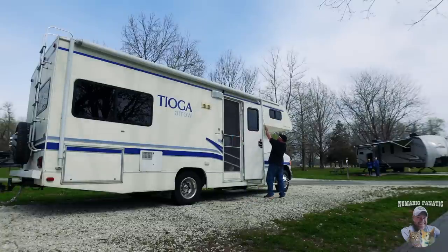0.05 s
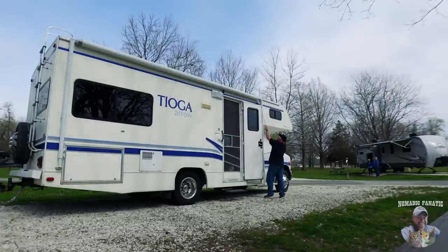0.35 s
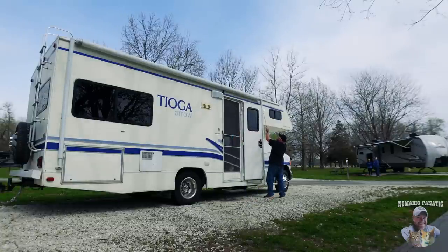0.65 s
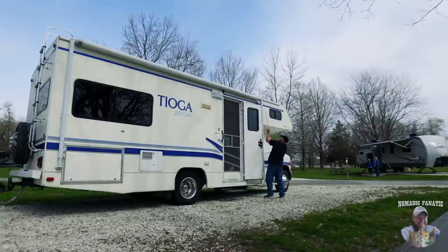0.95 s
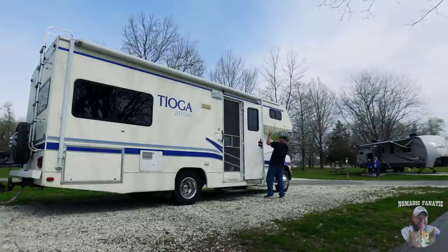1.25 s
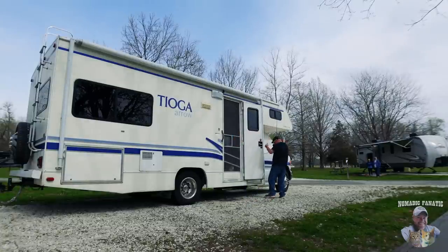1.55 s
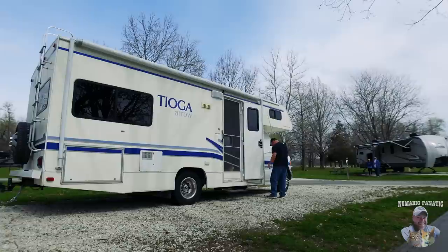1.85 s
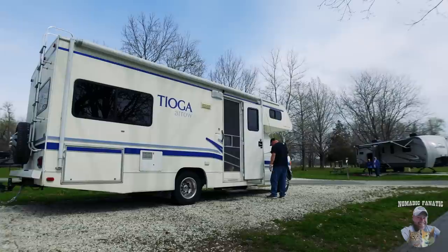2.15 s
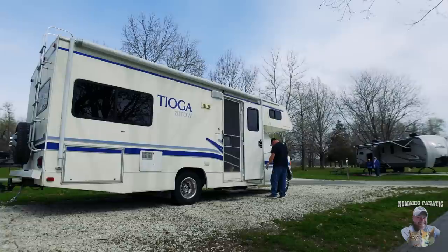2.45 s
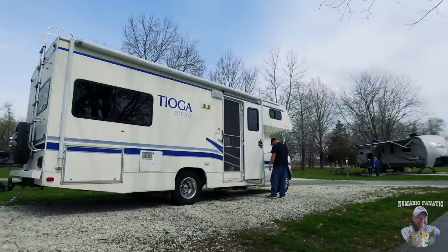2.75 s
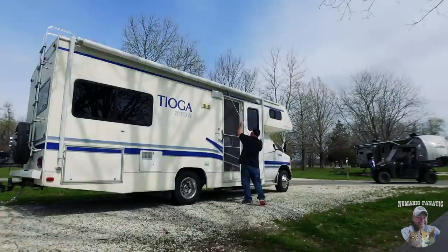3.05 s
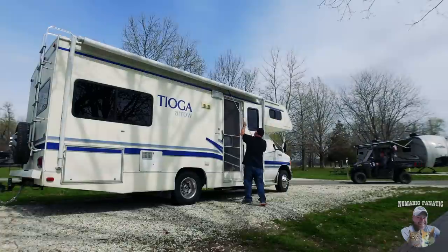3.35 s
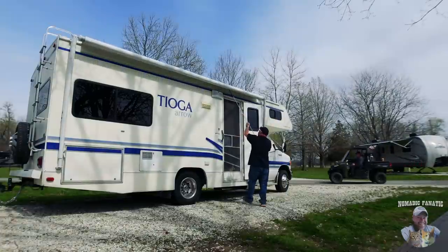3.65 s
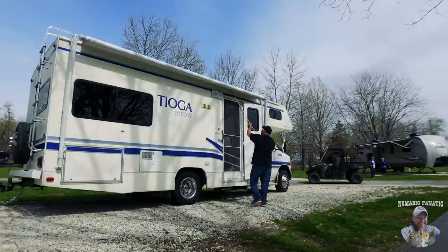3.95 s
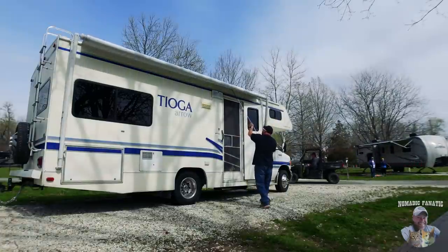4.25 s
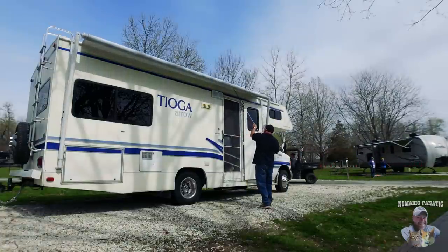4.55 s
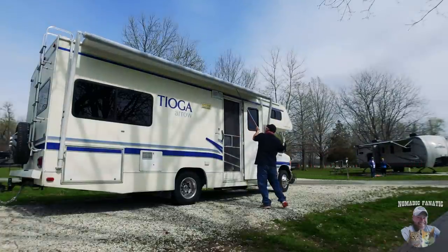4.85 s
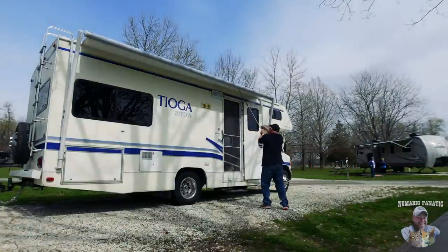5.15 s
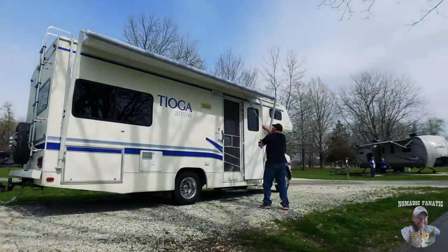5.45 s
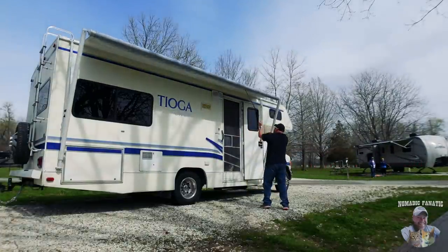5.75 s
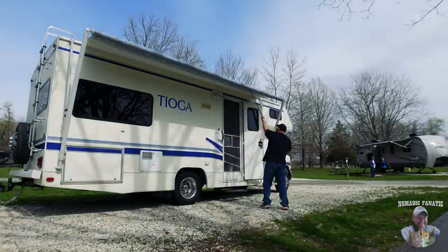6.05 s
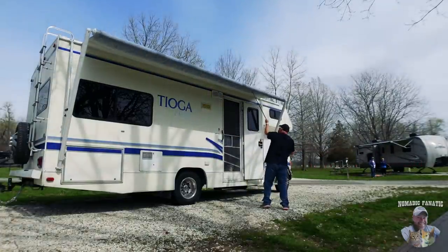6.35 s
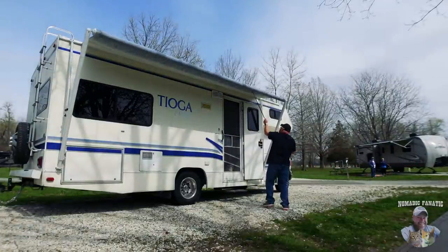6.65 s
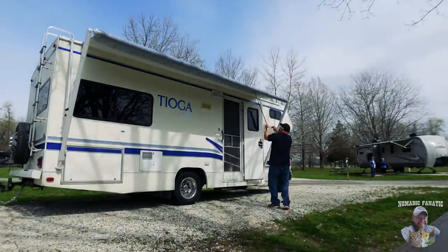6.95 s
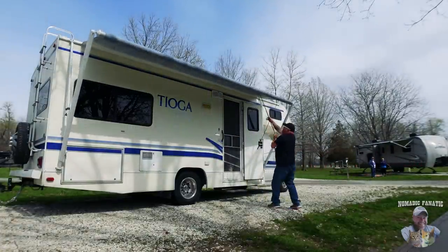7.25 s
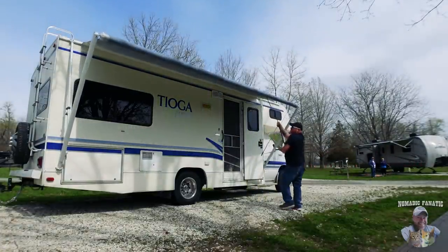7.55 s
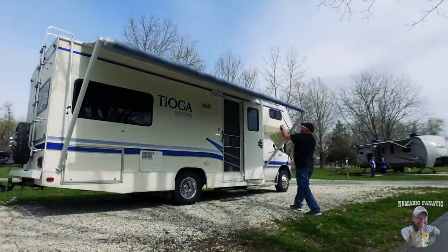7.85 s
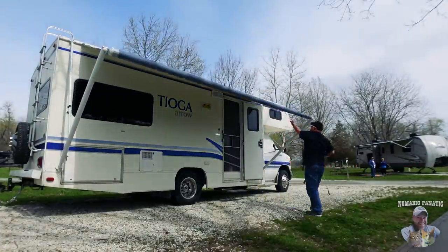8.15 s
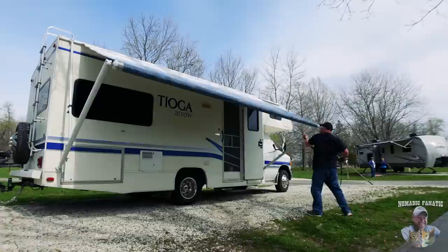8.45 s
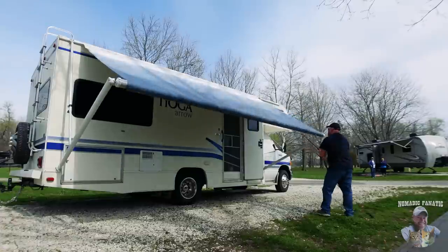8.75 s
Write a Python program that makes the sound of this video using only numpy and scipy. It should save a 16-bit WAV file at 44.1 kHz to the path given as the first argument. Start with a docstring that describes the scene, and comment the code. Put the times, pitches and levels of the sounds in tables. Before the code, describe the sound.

Metal latches snap on a camper's awning over a faint distant rumble. A single-cylinder utility cart comes in and thuds past with a brief whine, easing off and then picking up again. Meanwhile the aluminium arms give hollow knocks, then a busy run of clanks and scrapes, with gravel clicking underfoot. Small birds chirp faintly, and canvas starts hissing off its roller at the end. Heard from one fixed spot outdoors.

```python
"""Hauling out a camper's awning

A man unlatches the arms and hauls them out: impacts and friction excite the modes of the aluminium tubes,
gravel clicks under his shoes and the canvas starts to hiss off its roller. A single-cylinder utility cart
thuds past behind the camper, each firing exciting its exhaust resonances; it eases off and picks up again.
Small birds chirp in gliding pure tones over the distant rumble of the campsite."""
import sys
import numpy as np
from scipy import signal
from scipy.fft import rfft, irfft
from scipy.io import wavfile
from scipy.ndimage import uniform_filter1d

SR = 44100
rng = np.random.default_rng(int(sys.argv[2]) if len(sys.argv) > 2 else 0)


def unload_audio(sound):
    """Save the sound as a 16-bit wav file, at the path given as the first command line argument."""
    columns = np.transpose(np.atleast_2d(sound))
    # keep every value between -1 and 1, then stretch to whole-number steps
    steps = np.round(np.clip(columns, -1, 1) * 32767)
    wavfile.write(sys.argv[1], SR, steps.astype(np.int16))


N = 391608
TIME = np.arange(N) / SR


def awning(ring_db=-4):
    """Modal response: impacts and friction are heard directly and set the long tubes ringing."""
    # modes of the aluminium arms: f/Hz, level/dB, T60/s
    modes = [(354, 3.5, 0.13), (724, -2, 0.031), (980, 2, 0.031), (1276, -6, 0.37), (1523, 1, 0.075),
             (1670, -6, 0.15), (2795, -3, 0.091), (3210, 7.5, 0.009), (3700, -8, 0.09), (4230, 6, 0.29),
             (5800, -18, .1), (7400, 7, 0.048), (13200, -8, .06)]
    force = latches() + bonks() + clanks() + rubbing() + sliding()
    tubes = sum(undb(db) * resonate(force, hz, np.log(1000) / np.pi / t60) for hz, db, t60 in modes)
    return force + undb(ring_db) * tubes


def knock(chatter_s, db, thud_db, bite_db, sizzle_db, ring_hz, share):
    """Contact chatter: loose metal gives a decaying noise burst, a share of it in one resonance."""
    fall_s, tail_s, tail_db, grit_db = 0.0085, 0.061, -23, 3
    t = np.arange(SR // 4) / SR
    hiss, grit = rng.standard_normal((2, len(t)))
    after = np.maximum(t - chatter_s, 0)
    contacts = undb(grit_db * np.repeat(grit, 40)[:len(t)])
    decay = np.exp(-after / fall_s - .5 * t / (chatter_s + fall_s))
    tail = undb(tail_db) * np.exp(-after / tail_s)
    attack = 1 - np.exp(-t / (.1 * chatter_s))  # a long scraping blow builds more slowly than a snap
    force = hiss * (contacts * decay + tail) * attack
    thud = undb(thud_db) * unit(band(force, 161, 390))
    body = unit(band(force, 566, 1820, order=3))
    bite = undb(bite_db) * unit(band(force, 2214, 4210, order=4))
    sizzle = undb(sizzle_db) * unit(band(band(force, 6900, 18000, order=3), 3000, 5700, order=1))
    ring = resonate(resonate(force, ring_hz, 60 + 0.029 * ring_hz), ring_hz, 300)
    ring = unit(ring) * np.hypot(1, undb(bite_db))  # as strong as body and bite together
    sound = thud + np.sqrt(1 - share) * (body + bite) + np.sqrt(share) * ring + sizzle
    # the level holds for the chatter and its first decay
    return sound * undb(db) * np.sqrt((chatter_s + .011) / t[-1])


def latches():
    """Contact hardness: the harder a latch snaps open, the more treble and the less thud."""
    # snaps: t/s, chatter/s, level/dB, hardness/dB, ring f/Hz, ring share
    snaps = [(.108, 0.0078, -49.5, 1.5, 880, 0.25), (0.131, 0.037, -47, -10, 1360, 0.3),
             (0.181, .002, -45.5, -2.5, 3720, 0.25), (.224, 0.033, -32, -5.5, 1660, 0.02),
             (0.247, 0.011, -29, -5.5, 363, 0.36), (0.3534, 0.0029, -31.5, 1, 3650, 0.25),
             (0.442, 0.016, -39, -3, 2720, 0.48), (.643, 0.0057, -52, -12.5, 2990, 0.2),
             (1.433, 0.0038, -42, -9, 1020, 0), (1.81, .002, -53.5, -3, 2680, 0.4)]
    thud_db, sizzle_db = -12.5, -10
    out = np.zeros(N)
    for s, chatter_s, db, hard_db, hz, share in snaps:
        add(out, s, knock(chatter_s, db, thud_db - hard_db, hard_db, sizzle_db + hard_db, hz, share))
    return out


def bonks():
    """Impulse response: a brief knock on a tube sounds hollow because one resonance dominates."""
    # knocks: t/s, level/dB
    knocks = [(1.368, -45.5), (1.551, -53.5), (3.259, -34), (5.004, -25.5), (5.436, -30.5)]
    out = np.zeros(N)
    for s, db in knocks:
        add(out, s, knock(0.0013, db, thud_db=-13.5, bite_db=-12, sizzle_db=-63, ring_hz=797, share=0.91))
    return out


def clanks():
    """Impact and rebound: a loose arm strikes its joint and falls back once, later after a longer blow."""
    # blows: t/s, chatter/s, level/dB, hardness/dB, rebound/dB re blow, ring f/Hz, ring share
    blows = [(5.923, 0.0051, -29, -7, -23, 855, 0.04), (6.017, 0.0063, -24.5, -10.5, -32, 1386, 0.5),
             (6.146, 0.0078, -36, -11, -5, 1090, 0), (7.163, 0.014, -33, 2, -10, 3180, 0.02),
             (7.24, .018, -25.5, -10.5, -8, 920, 0.09), (7.318, 0.014, -31.5, -20, -6, 1004, 0.86),
             (7.407, 0.024, -28, -7, -3, 1080, 0.1), (7.538, 0.014, -34.5, -10, -11, 1090, 0.1),
             (7.611, 0.0053, -29, -4.5, -9.5, 515, 0.78), (7.736, 0.016, -23, -5.5, -3.5, 1186, 0.47),
             (7.835, 0.044, -20, -18, -4.5, 720, 0.3), (7.973, 0.028, -35, -13, -26, 1080, 0.2),
             (8.05, 0.017, -28.5, 0.5, -34, 610, 0.62), (8.128, 0.032, -24, -10.5, -3.5, 704, 0.07),
             (8.181, 0.028, -37, 1.5, -20, 1770, 0.4), (8.265, 0.015, -24.5, -10.5, -16, 693, 0.16),
             (8.338, 0.027, -32, -7.5, -24, 1320, 0), (8.485, 0.011, -34, -15, -16, 1520, .22),
             (8.525, 0.024, -25.5, -6, -5.5, 790, 0.3), (8.666, 0.0097, -22.5, -3, -13, 415, 0.36),
             (8.731, .028, -29, -4, -16, 428.4, 0.15)]
    thud_db, sizzle_db = -8, -19
    out = np.zeros(N)
    for s, chatter_s, db, hard_db, rebound_db, hz, share in blows:
        add(out, s, knock(chatter_s, db, thud_db, hard_db, sizzle_db + hard_db, hz, share))
        rebound = knock(0.76 * chatter_s, db + rebound_db, thud_db,
                        bite_db=-5.5, sizzle_db=-15.5, ring_hz=hz, share=share)
        add(out, s + .019 + 0.49 * chatter_s, rebound)
    return out


def rubbing():
    """Stick-slip friction: an arm rubs on its bracket and drives one hollow resonance."""
    # rubs: t/s, length/s, level/dB
    rubs = [(4.797, 0.61, -44), (5.963, .3, -45.5), (6.778, 0.23, -44)]
    pressure = sum(undb(db) * np.sin(np.pi * ramp(s, length_s)) for s, length_s, db in rubs)
    return unit(resonate(grains(1500, spread_db=2.3), hz=1190, width_hz=220)) * pressure


def sliding():
    """Sliding friction: dense tiny impacts make a wavering scrape as the arms run in their channels."""
    # scrape: t/s, level/dB
    levels = [(6.6, -100), (7.1, -49.5), (7.35, -38.5), (7.65, -45.5), (7.85, -42), (8.25, -35),
              (8.45, -42.5), (8.6, -34), (8.88, -35.5)]
    scrape = unit(band(grains(2200, spread_db=2.3), 300, 1760))
    return scrape * undb(curve(levels) + 2.5 * walk(35))


def canvas():
    """Shot noise: thousands of tiny impulses a second merge into a hiss as canvas leaves the roller."""
    # canvas spectrum: f/Hz, relative level/dB
    spectrum = [(290, -31.5), (500, -28), (1080, -23), (1180, -3), (1360, -25), (2390, -13.5), (2980, -9),
                (8830, -18.5), (16000, -28)]
    # unrolling: t/s, level/dB
    levels = [(8.5, -110), (8.7, -48), (8.77, -33), (8.82, -31), (8.88, -33)]
    return colour(grains(7000, spread_db=0.64), spectrum) * undb(curve(levels) + 1.9 * walk(90))


def gravel(click_s=0.00032, tail_s=0.007):
    """Short contacts give broadband clicks: stones snap together underfoot, with fine crunching between."""
    # clicks: t/s, peak level/dB
    stones = [(5.465, -25), (5.7699, -25), (5.957, -24.5), (6.177, -20.5), (6.3812, -23), (6.91, -36),
              (7.034, -33), (7.0931, -30), (7.1103, -26), (7.287, -21), (7.298, -28), (7.319, -17.5),
              (8.082, -12.5)]
    # shuffling shoes: t/s, level/dB
    shuffle = [(0, -74), (2.8, -92), (3.2, -73.5), (5.2, -83), (5.8, -61), (6.6, -82), (7.2, -56),
               (8.88, -100)]
    out, t = np.zeros(N), np.arange(SR // 40) / SR
    decay = np.exp(-t / click_s) + 0.3 * np.exp(-t / tail_s)
    for s, db in stones:
        click = band(rng.standard_normal(len(t)) * decay, 1200, 8000, order=1)
        add(out, s, click / np.abs(click).max() * undb(db))
    crunch = unit(band(grains(220, spread_db=3.8), 2500, 12000, order=1))
    return out + crunch * undb(curve(shuffle) + 3 * walk(9))


def cart():
    """A moving source: levels rise with engine speed and fall by spherical spreading and screening."""
    # engine speed: t/s, firing f/Hz
    speed = [(2.6, 31.2), (3.88, 31.9), (5.03, 31.8), (5.77, 29.5), (5.91, 29.4), (6.31, 26.1),
             (6.57, 26.2), (6.83, 25.0), (6.99, 23.8), (7.22, 24.6), (7.36, 25.7), (7.43, 25.9),
             (7.6, 24.1), (7.9, 29.7), (8.11, 29.8), (8.3, 32.4), (8.88, 34.4)]
    cruise_hz, travel_m_s, nearest_m = 31.7, 8.26, 16.2
    first_firing_s, enters_s, passes_s, hides_s = 2.573, 2.575, 4.28, 4.744
    firing_hz = curve(speed)
    cycles = np.cumsum(firing_hz) / SR
    cycles -= np.interp(first_firing_s, TIME, cycles)
    excess_hz = firing_hz - cruise_hz
    along_m = travel_m_s * (TIME - passes_s)
    distance_m = np.hypot(nearest_m, along_m)
    spreading_db = 20 * np.log10(nearest_m / distance_m)
    # the bark is higher with more throttle, and from ahead of the cart
    bark_hz = 184.2 + 2.2 * excess_hz - 5.6 * along_m / distance_m
    # the camper screens the clatter more than the bark; the boom loses little with distance
    screened = ramp(hides_s, 0.29)
    bark_db = -20 + 1.6 * excess_hz + spreading_db - 2 * screened
    boom_db = -35.5 + 0.98 * excess_hz + 0.11 * spreading_db
    clatter_db = -31.5 + .5 * excess_hz + spreading_db - 6 * screened
    quick_fade_in, slow_fade_in = ramp(enters_s, 0.46), ramp(enters_s, 0.69)
    boom_gain = undb(boom_db) * slow_fade_in
    pulses = exhaust(cycles, firing_hz, bark_hz, bark_db, boom_gain)
    outlet = detoured(pulses) + gas_stream(bark_db, boom_gain)
    running_gear = clatter(cycles, clatter_db) + tyres(clatter_db - 25) + belt()
    return outlet * quick_fade_in + running_gear * slow_fade_in


def exhaust(cycles, firing_hz, bark_hz, bark_db, boom_gain, jitter_s=.00005, scatter_db=.4):
    """Pulse excitation: each firing rings the silencer, the tailpipe and the exhaust's low modes."""
    # tailpipe resonance: t/s, level/dB
    pipe_levels = [(2.8, -38.5), (3.5, -35.5), (5.2, -39.5), (5.85, -36), (6.2, -40), (6.55, -37),
                   (7.05, -48), (7.35, -31.5), (7.7, -35.5), (8.2, -40), (8.88, -49)]
    # low modes: f/Hz, swell/s, relative level/dB
    low_modes = [(110, 0.01215, -0.5), (53.2, 0.0194, -6)]
    pipe_db = curve(pipe_levels)
    rasp = undb(-22.5) * bark(hz=445, swell_s=.002)
    pipe = bark(hz=320, swell_s=0.00766)
    boom = sum(undb(db) * bark(hz, swell_s) for hz, swell_s, db in low_modes)
    firings = np.flatnonzero(np.diff(np.floor(cycles)))
    out = np.zeros(N)
    for i, (late, loud, bright) in zip(firings, rng.standard_normal((len(firings), 3))):
        silencer = (bark(bark_hz[i], swell_s=0.0062) + rasp) * undb(bark_db[i])
        pulse = silencer + pipe * undb(pipe_db[i] + 0.29 * bright) + boom * boom_gain[i]
        add(out, i / SR + jitter_s * late, pulse * undb(scatter_db * loud) / np.sqrt(firing_hz[i]))
    return out


def bark(hz, swell_s):
    """A damped resonance swells and dies within a few cycles; it has the energy of 1 s at rms 1."""
    t = np.arange(SR // 12) / SR
    wave = t ** 2 * np.exp(-2 * t / swell_s) * np.sin(2 * np.pi * hz * (t - swell_s))
    return wave * np.sqrt(SR / np.sum(wave ** 2))


def detoured(x):
    """Multipath: behind the camper the direct sound fades and reflections fill the gaps between firings."""
    # sound arriving by way of trees and campers: t/s, amplitude share
    indirect = [(2.55, 0.17), (5.4, 0.23), (6.3, 0.41), (6.8, 0.66), (7.7, 0.53), (8.1, 0.4), (8.88, 0.1)]
    # reflections: delay/s, gain
    paths = [(0.0099, 0.28), (0.0172, 0.38), (0.0284, .5)]
    share = curve(indirect)
    echoes = sum(gain * np.interp(TIME - delay, TIME, x) for delay, gain in paths)
    return band(np.sqrt(1 - share ** 2) * x + share * echoes, 53, 2600)


def gas_stream(bark_db, boom_gain):
    """Flow noise: the exhaust gas rushes and rumbles on between firings."""
    rush = unit(band(rng.standard_normal(N), 216, 296)) * undb(bark_db - 15)
    rumble = unit(band(rng.standard_normal(N), 79, 140, order=3)) * boom_gain * undb(-9)
    return rush + rumble


def clatter(cycles, db, depth=0.12):
    """Amplitude modulation: the noise of the valve gear swells a little once a cycle."""
    # mechanical noise spectrum: f/Hz, relative level/dB
    spectrum = [(250, -21), (430, 5), (523, -0.5), (903, -5), (1400, -5), (1510, -6), (2600, -10),
                (2980, -10.5), (3120, -12.5), (3690, -12.5), (4700, -21), (6260, -25), (6750, -29),
                (12200, -40), (16000, -44)]
    swell = 1 + depth * np.sin(2 * np.pi * cycles)
    rattle = rng.standard_normal(N) + 0.43 * grains(900, spread_db=0.45)
    return colour(rattle * swell, spectrum) * undb(db + 0.16 * walk(18))


def tyres(db):
    """Random impacts: stones pop under the tyres in a thin crackle."""
    return unit(band(grains(500, spread_db=5), 5100, 7400)) * undb(db)


def belt(hz=2945):
    """Narrow-band noise is heard as a pitch: the drive belt whines."""
    # whine: t/s, level/dB
    levels = [(3.1, -64), (3.9, -42), (4.65, -40.5), (5.05, -51), (5.4, -80)]
    whine = resonate(resonate(rng.standard_normal(N), hz, width_hz=32), hz, width_hz=90)
    return unit(whine) * undb(curve(levels))


def birds():
    """Frequency sweeps: runs of rising chirps, each with a fainter falling note, and a few thin whistles."""
    # phrases: t/s, spacing/s, level/dB, lowest f/Hz, highest f/Hz, falling note f/Hz
    phrases = [(.405, .1445, -63, 4500, 5500, 4800), (5.21, .084, -58, 4600, 5800, 7900),
               (6.459, .084, -49, 4500, 5900, 8000)]
    # number of chirps in each phrase
    counts = [10, 15, 13]
    # whistles: t/s, length/s, level/dB, start f/Hz, end f/Hz, trill depth/Hz
    whistles = [(0.665, 0.23, -68, 6900, 7100, 220), (1.61, 0.26, -77, 7500, 8700, 30.1),
                (2.48, 0.17, -81, 7200, 7600, 30)]
    chirp_s, answer_s = .034, 0.02
    out = np.zeros(N)
    for (start, spacing, db, lo_hz, hi_hz, answer_hz), count in zip(phrases, counts):
        for k, (pitch, loud) in enumerate(rng.standard_normal((count, 2))):
            s, detune = start + k * spacing, 1 + .008 * pitch
            add(out, s, note(chirp_s, db + 1.1 * loud, lo_hz * detune, hi_hz * detune))
            add(out, s + spacing / 2, note(answer_s, db - 9, answer_hz * 1.06, answer_hz * .96))
    for s, *shape in whistles:
        add(out, s, note(*shape))
    return out


def note(length_s, db, from_hz, to_hz, trill_depth_hz=0, trill_rate_hz=170):
    """Frequency modulation: a pure tone glides, fast at first, with an optional trill."""
    progress = np.linspace(0, 1, int(length_s * SR))
    hz = from_hz + (to_hz - from_hz) * np.sin(np.pi / 2 * progress)
    hz += trill_depth_hz * np.sin(2 * np.pi * trill_rate_hz * progress * length_s)
    return undb(db) * np.sin(np.pi * progress) ** 2 * np.sin(2 * np.pi * np.cumsum(hz) / SR)


def campsite(db=-47.5):
    """Ambient noise: far traffic rumbles and wavers under a smooth outdoor hiss."""
    # ambient spectrum: f/Hz, relative level/dB
    spectrum = [(15, -41), (25, -27), (74, -9.5), (180, 0), (242, -4.5), (344, -13), (373, -13.5),
                (503, -22.5), (1520, -23), (2280, -28.5), (2690, -29), (5000, -37.5), (6740, -48),
                (13600, -52), (16000, -49)]
    air = colour(rng.standard_normal(N), spectrum)
    rumble = band(air, 60, 500, order=1)
    return (air + 0.15 * walk(8) * rumble) * undb(db)


def outdoors(x, t60_s=0.28, wet_db=-23):
    """Scattering: trees and parked campers return a thin, dull reverberation."""
    t = np.arange(SR // 2) / SR
    echo = band(rng.standard_normal(len(t)), 260, 2400, order=1) * undb(-60 * t / t60_s) * (t > .012)
    return x + undb(wet_db) * signal.fftconvolve(x, echo / np.linalg.norm(echo))[:N]


def undb(db):
    """Level to amplitude ratio."""
    return 10 ** (np.asarray(db) / 20)


def unit(x):
    """Normalisation to rms 1."""
    return x / np.sqrt(np.mean(x ** 2) + 1e-20)


def curve(table):
    """Linear interpolation of (t/s, value) points."""
    return np.interp(TIME, *np.transpose(table))


def ramp(start_s, length_s):
    """A linear rise from 0 to 1."""
    return np.clip((TIME - start_s) / length_s, 0, 1)


def add(track, s, sound):
    """Superposition of a sound on the track at time s."""
    start = max(int(s * SR), 0)
    track[start:start + len(sound)] += sound[:max(N - start, 0)]


def resonate(x, hz, width_hz):
    """A second-order resonance, gain 1 at its centre."""
    return signal.lfilter(*signal.iirpeak(hz, hz / width_hz, fs=SR), x)


def band(x, lo_hz, hi_hz, order=2):
    """A causal band-pass filter."""
    return signal.sosfilt(signal.butter(order, [lo_hz, hi_hz], "band", fs=SR, output="sos"), x)


def colour(x, spectrum):
    """Spectral shaping by (f/Hz, level/dB) points, to rms 1."""
    hz, db = np.transpose(spectrum)
    gain = undb(np.interp(np.log(np.fft.rfftfreq(N, 1 / SR) + 1), np.log(hz), db))
    return unit(irfft(rfft(x) * gain, N))


def walk(rate_hz):
    """A smooth random fluctuation of rms 1."""
    hold = int(SR / rate_hz)
    steps = np.repeat(rng.standard_normal(N // hold + 1), hold)
    return unit(uniform_filter1d(steps, hold)[:N])


def grains(per_s, spread_db):
    """Shot noise of rms 1: random tiny impacts, a few stronger than the rest."""
    size = undb(spread_db * np.minimum(rng.exponential(size=N), 4))
    return unit((rng.random(N) < per_s / SR) * rng.standard_normal(N) * size)


def scene():
    """Superposition of all sources at one spot on the lawn."""
    return (outdoors(awning() + canvas() + gravel() + birds()) + cart() + campsite())[None]


def record(dry, top_hz=15900):
    """Band limiting: a steep low-pass removes the highest treble."""
    return signal.sosfilt(signal.ellip(8, .2, 70, top_hz, fs=SR, output="sos"), dry)


dry = scene()
out = record(dry)
unload_audio(out)
```